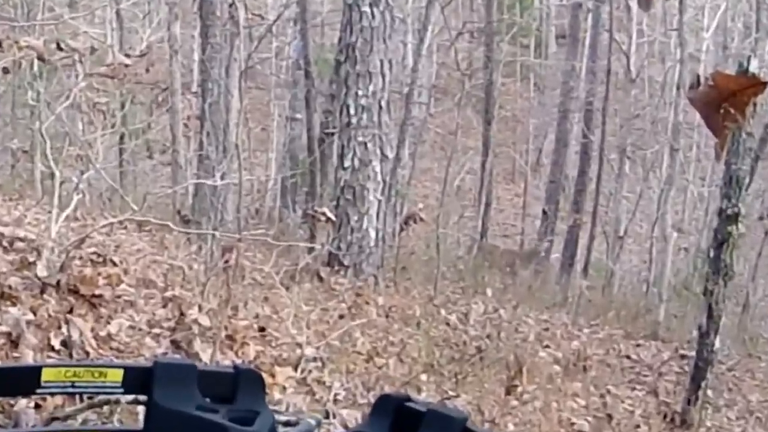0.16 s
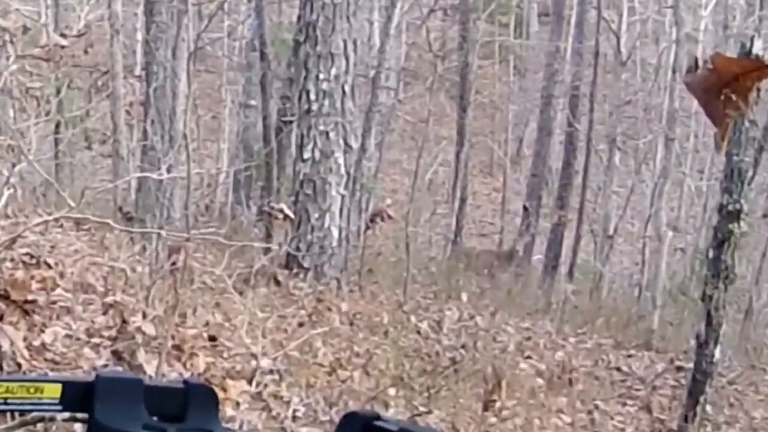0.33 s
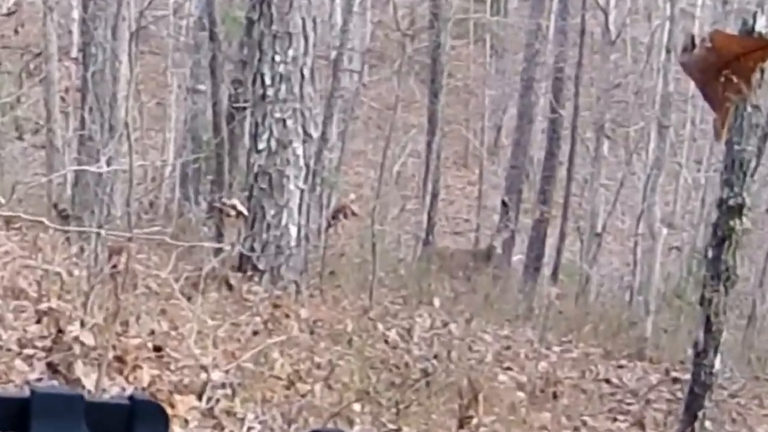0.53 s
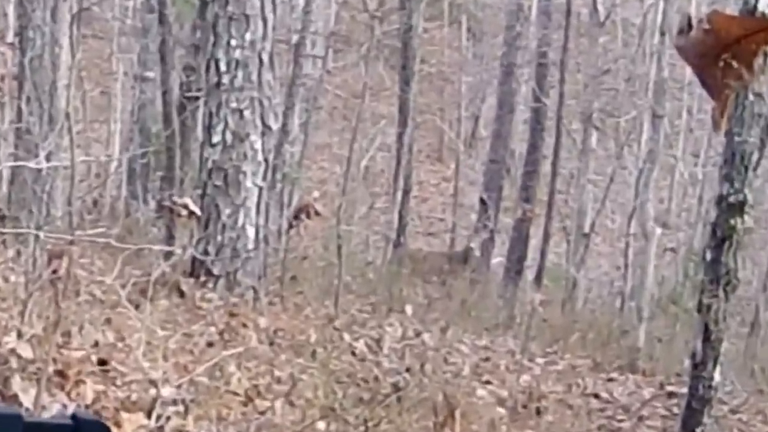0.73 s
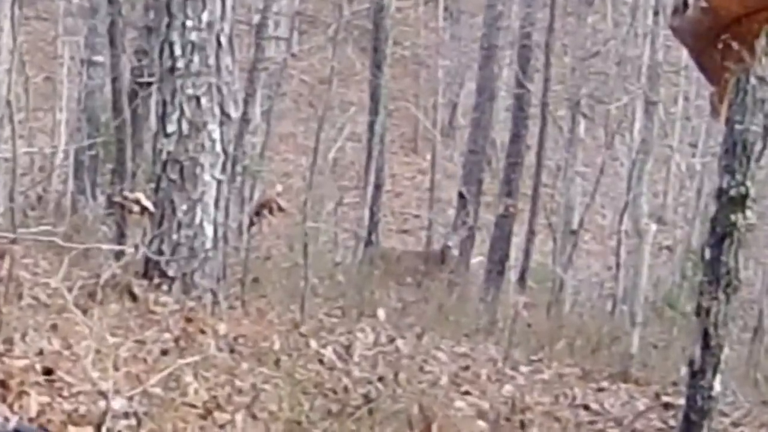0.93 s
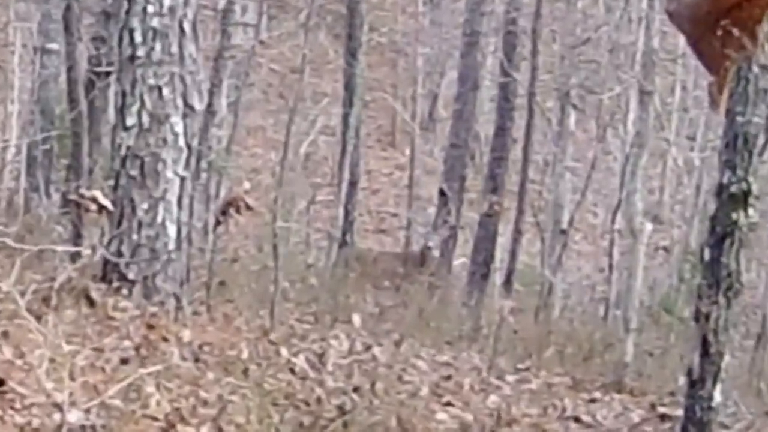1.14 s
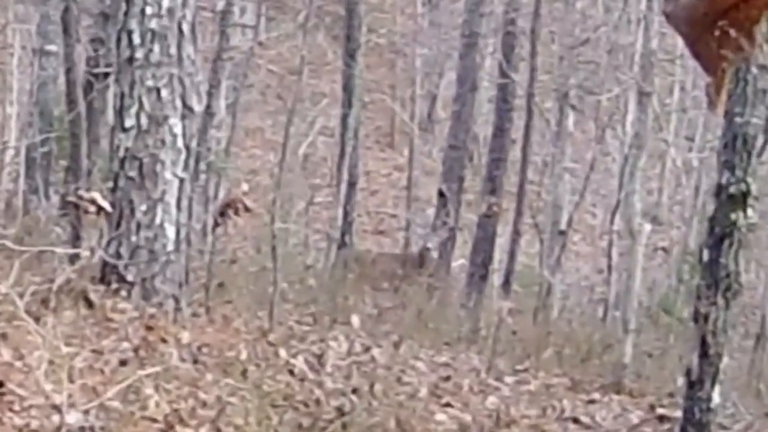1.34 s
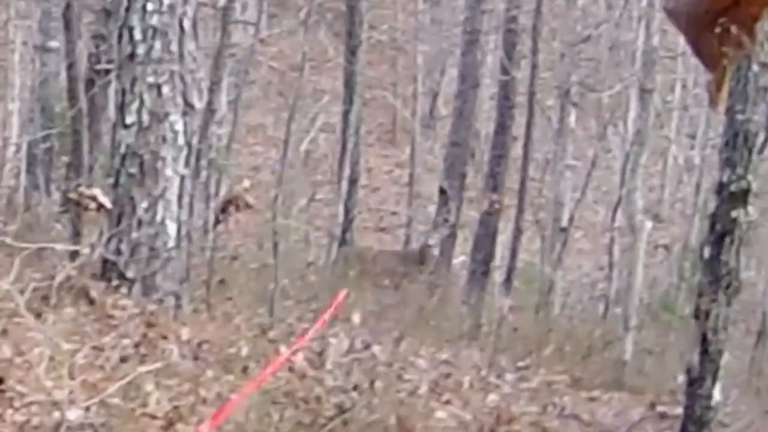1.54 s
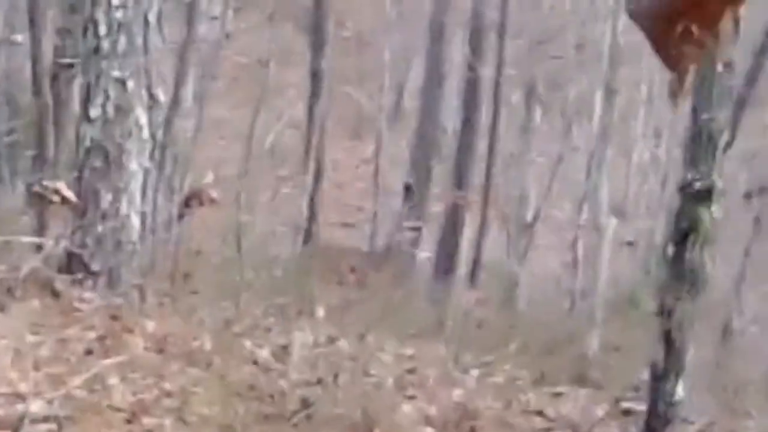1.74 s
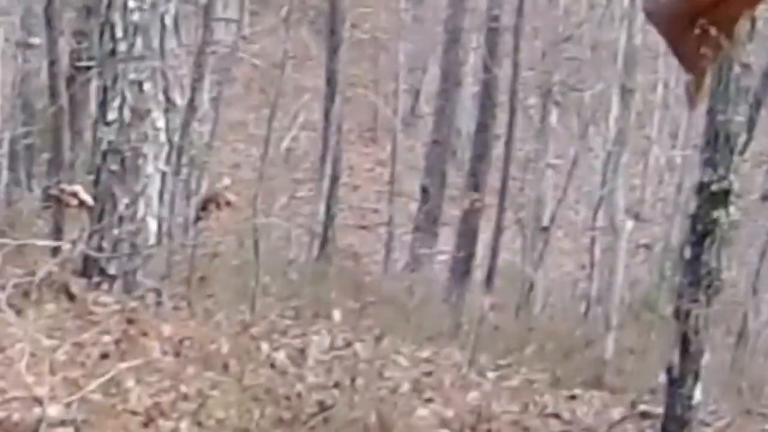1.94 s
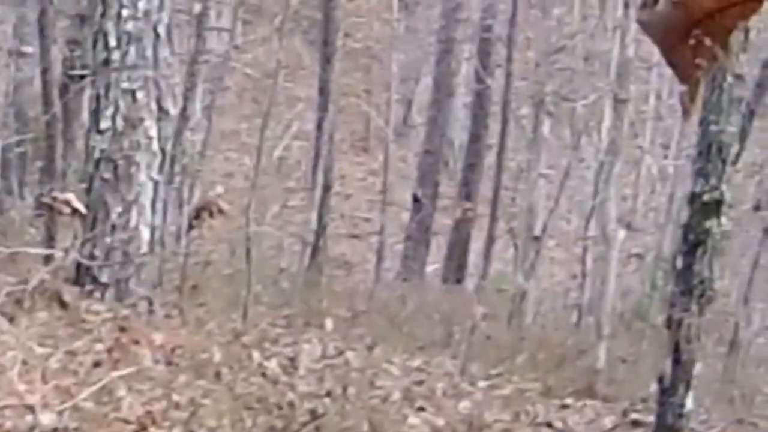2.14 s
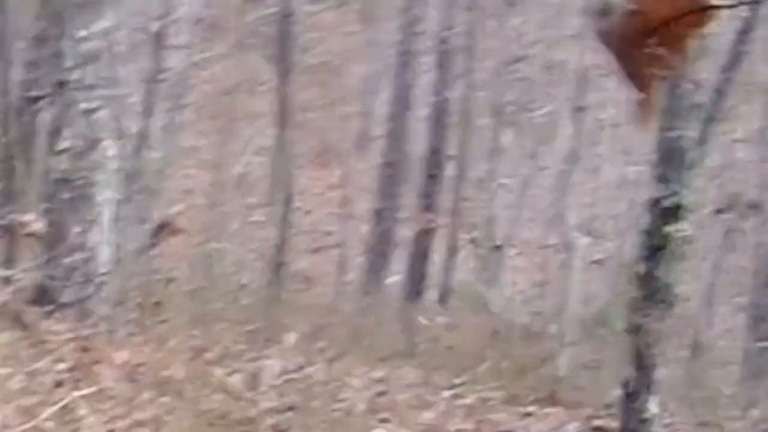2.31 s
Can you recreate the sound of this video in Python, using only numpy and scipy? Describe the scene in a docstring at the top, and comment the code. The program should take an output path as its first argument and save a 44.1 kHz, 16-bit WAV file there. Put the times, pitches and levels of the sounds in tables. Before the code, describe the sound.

After quiet woodland air, a crossbow fires right beside the microphone with a hard, clacking snap; its short echo scatters among trees, a faint bolt strike follows, then soft handling bumps and a twig click.

```python
"""A crossbow is fired close beside the microphone in quiet, bare woods.
Latch and string clack in bursts of noise, the string scrapes along the rail, and limbs and stock ring in decaying modes.
The trunks scatter the shot as decaying noise; the bolt strikes far off with a crack, a thud and duller scatter.
Dry leaves crackle softly, twigs snap in short modes, and the stock is bumped, over faint air and microphone hiss."""
import sys
import numpy as np
from scipy import signal
from scipy.fft import rfft, irfft
from scipy.io import wavfile
from scipy.ndimage import uniform_filter1d

SR = 44100
rng = np.random.default_rng(int(sys.argv[2]) if len(sys.argv) > 2 else 0)


def file_out(sig):
    """Save sig as 16-bit WAV at sys.argv[1]."""
    # one column per channel
    cols = np.atleast_2d(sig).T
    # limit, then scale
    lim = np.clip(cols, -1, 1)
    pcm = np.round(lim * 32767).astype(np.int16)
    wavfile.write(sys.argv[1], SR, pcm)


N = 104649  # length in samples

# A t60 is the time in which a sound falls by 60 dB.
# Spectrum of the air in the woods. Each row: frequency in Hz, relative density in dB per Hz.
AIR_SPECTRUM = [(20, -1), (59, 0.5), (118, -2.5), (221, -4), (394, -6.5), (780, -9.3), (2180, -16.5),
                (5000, -25.5), (9000, -38.5), (16000, -57.5)]
AIR_DB, AIR_PATCH_DB, HISS_DB = -58.5, 1.5, -69.5  # rms levels of air and hiss; rms drift of the air

# Clacks of latch, string and limbs, close to the microphone.
# Each row: start in seconds, level in dB, t60 in seconds, tilt in dB per octave.
CLACKS = [(1.6022, -13, 0.017, -2), (1.6042, -7, .022, .5), (1.6118, -12, .02, 2), (1.6144, -7, 0.02, -1.5),
          (1.6188, -19, .05, -1.5), (1.6317, -32.5, .035, -6), (1.6415, -46, .03, -3)]
# Colour of a clack. Each row: frequency in Hz, relative level in dB.
CLACK_COLOUR = [(60, -17), (300, -7), (800, -7), (1300, -3), (1900, -2.5), (2700, -6.5), (3600, -0.5),
                (5500, -5.5), (8500, -8), (11500, -16), (15000, -13.5)]
# Modes of the latch and rail, rung at the release. Each row: frequency in Hz, level in dB, t60 in seconds.
LATCH_MODES = [(1826, -28, .05), (1903, -19.5, .045), (2073, -22.5, 0.033), (3070, -26, 0.045),
               (3180, -22, 0.04), (3647, -17.5, 0.054), (4000, -27, .045), (4553, -33.5, .05),
               (4920, -27.5, 0.046), (7160, -33.5, .05), (8786, -35, 0.043)]
LATCH_S, LATCH_RISE_S = 1.6024, 0.0012
RAIL_S, RAIL_LENGTH_S, RAIL_DB = 1.6055, 0.0075, -18  # the string drives the bolt along the rail
# Modes of limbs, string and stock. Each row: frequency in Hz, level in dB, t60 in seconds.
BOW_MODES = [(160, -13.5, 0.03), (259.7, -22, 0.08), (360.5, 5, 0.018), (449, -11.5, 0.067),
             (690, -22, 0.047), (824, -15.5, 0.046), (1236, -9.5, .04), (1301, -16, 0.045),
             (1470, -20, 0.045), (1766, -21.5, 0.073), (2241, -24, 0.054), (2420, -21.5, 0.041),
             (3040, -25.5, 0.044), (3618, -22.5, .038)]
# Faint after-ring of string and limbs. Each row: frequency in Hz, level in dB, t60 in seconds.
HUM_MODES = [(514, -49, .55), (258, -50, .25)]
STOP_S, STOP_RISE_S = 1.6112, 0.0012  # the string meets its stops

# Scatter of the shot from the trunks. Each row: frequency in Hz, gain in dB.
WOODS_GAIN = [(50, -13.5), (150, -30.5), (400, -36), (700, -23.5), (1300, -28.5), (2000, -27.5),
              (4000, -28.5), (8000, -27), (15000, -25.5)]
# Decay of that scatter. Each row: frequency in Hz, t60 in seconds.
WOODS_T60 = [(60, 1.0), (400, 0.72), (1500, .62), (4000, .46), (14000, .38)]

# Stirs of dry leaves. Each row: centre in seconds, Gaussian half length in seconds, level in dB.
RUSTLES = [(1.678, .007, -47.5), (1.812, 0.017, -56.5), (1.995, 0.041, -56.5), (2.17, 0.16, -64),
           (2.347, 0.022, -62.5)]
# Colour of the leaves. Each row: frequency in Hz, relative level in dB.
LEAF_COLOUR = [(200, -14.5), (700, 4.5), (2000, -1.5), (4000, 2.5), (6000, -8), (8000, -3), (11000, -19),
               (15000, -13)]
CRACKLE_DB = 2  # rms wander of the leaf level

# Twig snaps. Each row: start in seconds, snap level in dB, tail level in dB.
SNAPS = [(1.7867, -45, -61), (1.7887, -38, -62), (2.2634, -25, -49.5)]
# Modes of a twig. Each row: frequency in Hz, relative level in dB, t60 in seconds.
TWIG_MODES = [(1510, -11.5, 0.0067), (3430, -3, 0.0064), (3880, -1.5, 0.0058), (8020, -6, 0.0048),
              (8450, -7.5, 0.0048)]
# Colour of the tail of a snap. Each row: frequency in Hz, relative level in dB.
TWIG_TAIL_COLOUR = [(200, -18), (900, -17), (1500, -2), (2200, -7), (3300, 5.5), (4400, -1), (5600, -18),
                    (8300, -1.5), (10500, -21), (15000, -16)]
TWIG_RISE_S, TWIG_TAIL_T60_S = 0.00053, 0.34

HIT_S, HIT_DB, HIT_T60_S = 1.8348, -29, 0.0077  # the bolt strikes far off
# Colour of the strike. Each row: frequency in Hz, relative level in dB.
HIT_COLOUR = [(60, -7), (600, 6), (1800, 3), (3000, 4.5), (5000, -6.5), (9000, -4), (12000, -12),
              (15000, -3.5)]
# Thud of the strike. One row: frequency in Hz, level in dB, t60 in seconds, rise in seconds.
HIT_THUD = (45, -42, .09, .002)
# Sound of the strike spread by ground and trees.
# Each row: delay in seconds, rise in seconds, level in dB, t60 in seconds, tilt in dB per octave.
HIT_SCATTER = [(.001, .003, -33, .07, -1), (.021, .012, -44.5, 0.29, -.6)]

# Soft bumps on the stock. Each row: start in seconds, level in dB, frequency in Hz, t60 in seconds.
BUMPS = [(1.942, -32, 76, .06), (1.981, -39, 85, .05), (2.225, -46, 99.5, .04)]
BUMP_RISE_S = 0.01023

# Microphone: low cut, treble notches, upper band edge
LOW_CUT_HZ, EDGE_HZ = 27, 15450
NOTCH_HZ, NOTCH_WIDTH_HZ, NOTCH_DB = [6020, 12050], [440, 450], [-11, -15.5]
OVERLOAD = 0.94  # ceiling of the soft overload, in sample amplitude


def amp(db):
    """Turns decibels into gain."""
    return 10 ** (np.asarray(db) / 20)


def unit(x):
    """Scales to rms 1."""
    return x / np.sqrt(np.mean(x ** 2) + 1e-20)


def read(points, hz):
    """Reads a table on a log-frequency axis."""
    f, value = np.transpose(points)
    return np.interp(np.log(hz + 1), np.log(f + 1), value)


def add(mix, s, sound):
    """Mixes a sound in at time s, cut off at the end of the mix."""
    part = mix[round(s * SR):][:len(sound)]
    part += sound[:len(part)]


def noise(colour, tilt_db=0):
    """Noise of rms 1 with the given spectrum, tilted above 300 Hz."""
    hz = np.fft.rfftfreq(N, 1 / SR)
    octaves = np.log2(np.maximum(hz, 300))
    gain = amp(read(colour, hz) + tilt_db * octaves)
    white = rng.standard_normal(N)
    return unit(irfft(rfft(white) * gain, N))


def fade(t60):
    """Exponential decay by 60 dB in t60 seconds."""
    t = np.arange(N) / SR
    return np.exp(-np.log(1000) * t / max(t60, 1e-4))


def burst(colour, db, t60, tilt_db=0):
    """A blow into many dense, dying resonances, heard as decaying noise."""
    return amp(db) * noise(colour, tilt_db) * fade(t60)


def ring(hz, db, t60, rise_s):
    """One decaying sine mode, pushed over a short time."""
    t = np.arange(N) / SR
    push = np.minimum(t / rise_s, 1)
    return amp(db) * np.sin(2 * np.pi * hz * t) * fade(t60) * push


def air():
    """The faint wash of the woods, drifting in patches of time and frequency, over microphone hiss."""
    z = signal.stft(noise(AIR_SPECTRUM), nperseg=1024)[2]
    patches = uniform_filter1d(rng.standard_normal(z.shape), size=12, axis=0)
    patches = unit(uniform_filter1d(patches, size=8, axis=1))
    wash = signal.istft(z * amp(AIR_PATCH_DB * patches), nperseg=1024)[1][:N]
    hiss = amp(HISS_DB) * rng.standard_normal(N)
    return amp(AIR_DB) * unit(wash) + hiss


def crossbow():
    """Clacks and ring of the latch, the scrape along the rail, and the ring of the bow as the string stops."""
    out = np.zeros(N)
    for s, db, t60, tilt_db in CLACKS:
        add(out, s, burst(CLACK_COLOUR, db, t60, tilt_db))

    for k, (hz, db, t60) in enumerate(LATCH_MODES):
        sign = (-1) ** k  # neighbouring modes start in opposite directions
        add(out, LATCH_S, sign * ring(hz, db, t60, LATCH_RISE_S))

    size = round(RAIL_LENGTH_S * SR)
    scrape = noise(CLACK_COLOUR)[:size] * signal.windows.tukey(size)
    add(out, RAIL_S, amp(RAIL_DB) * scrape)

    for hz, db, t60 in BOW_MODES + HUM_MODES:
        add(out, STOP_S, ring(hz, db, t60, STOP_RISE_S))
    return out


def woods(x):
    """Countless small echoes from trunks, as a decaying noise response; the treble dies first."""
    hz, t, z = signal.stft(rng.standard_normal(N), SR, nperseg=512)
    t60 = read(WOODS_T60, hz)[:, None]
    gain = amp(read(WOODS_GAIN, hz))[:, None]
    decay = np.exp(-np.log(1000) * t / t60)
    even_energy = np.sqrt(2 * np.log(1000) / (t60 * SR))  # a longer decay adds no energy
    echoes = signal.istft(z * gain * decay * even_energy, SR, nperseg=512)[1]
    return signal.fftconvolve(x, echoes)[:N]


def leaves():
    """Soft swells of fine crackle: noise whose level wanders quickly."""
    t = np.arange(N) / SR
    wander = unit(uniform_filter1d(rng.standard_normal(N), size=60))
    crackle = unit(noise(LEAF_COLOUR) * amp(CRACKLE_DB * wander))
    swell = sum(amp(db) * np.exp(-.5 * ((t - s) / half) ** 2) for s, half, db in RUSTLES)
    return crackle * swell


def twigs():
    """Thin, bright snaps of short modes, each with a faint noise tail among the trees."""
    out = np.zeros(N)
    snap = sum(ring(hz, db, t60, TWIG_RISE_S) for hz, db, t60 in TWIG_MODES)
    for s, db, tail_db in SNAPS:
        tail = burst(TWIG_TAIL_COLOUR, tail_db, TWIG_TAIL_T60_S)
        add(out, s, amp(db) * snap + tail)
    return out


def bolt():
    """A distant crack and thud, followed by their duller scatter."""
    out, t = np.zeros(N), np.arange(N) / SR
    crack = burst(HIT_COLOUR, HIT_DB, HIT_T60_S)
    add(out, HIT_S, crack + ring(*HIT_THUD))
    for delay, rise_s, db, t60, tilt_db in HIT_SCATTER:
        scatter = burst(HIT_COLOUR, db, t60, tilt_db) * np.minimum(t / rise_s, 1)
        add(out, HIT_S + delay, scatter)
    return out


def bumps():
    """Low knocks of handling, each a single slowly pushed mode."""
    out = np.zeros(N)
    for s, db, hz, t60 in BUMPS:
        add(out, s, ring(hz, db, t60, BUMP_RISE_S))
    return out


def scene():
    """The close shot and what surrounds it in the woods, on one channel."""
    shot = crossbow()
    mix = air() + shot + woods(shot) + leaves() + twigs() + bolt() + bumps()
    return mix[None]


def record(dry):
    """Two treble notches and the low cut of the microphone, soft overload, then the band limit."""
    hz = np.fft.rfftfreq(N, 1 / SR)
    notches = zip(NOTCH_HZ, NOTCH_WIDTH_HZ, NOTCH_DB)
    colour_db = sum(db / (1 + ((hz - f) / width) ** 2) for f, width, db in notches)

    # minimum phase, so that the notches ring only after a sound
    log_gain = np.log(amp(np.r_[colour_db, colour_db[:0:-1]]))
    causal = np.exp(np.conj(signal.hilbert(log_gain)))[:len(hz)]
    x = irfft(rfft(dry) * causal, N)

    x = signal.lfilter(*signal.butter(1, LOW_CUT_HZ, "high", fs=SR), x)
    x = x / (1 + (x / OVERLOAD) ** 8) ** (1 / 8)
    band_limit = signal.firwin(255, EDGE_HZ, window=("kaiser", 9), fs=SR)
    return signal.oaconvolve(x, band_limit[None], "same")


dry = scene()
out = record(dry)
file_out(out)
```